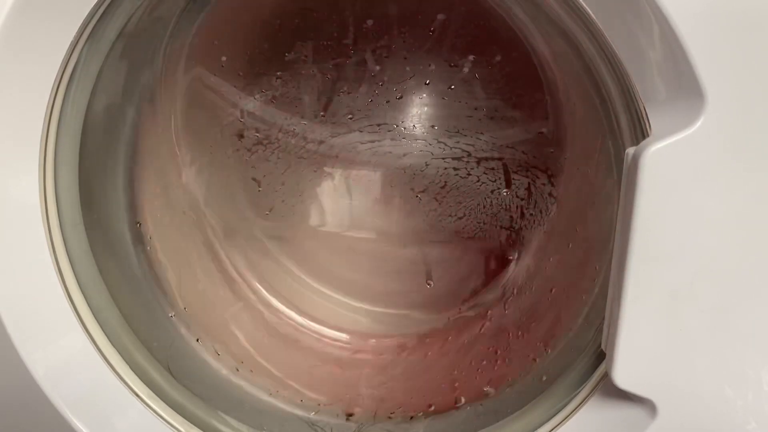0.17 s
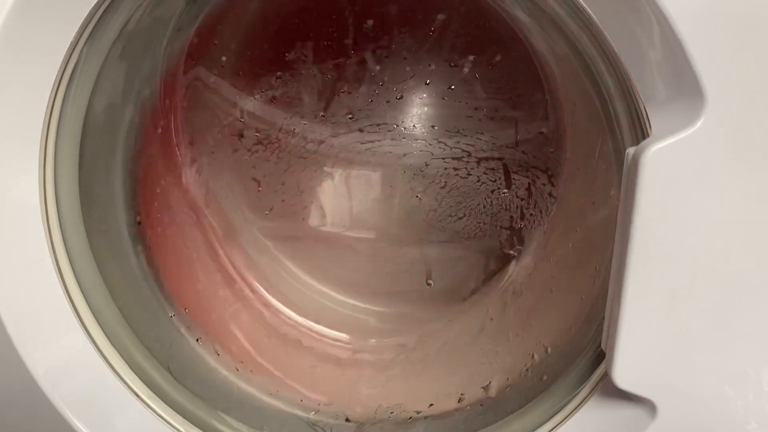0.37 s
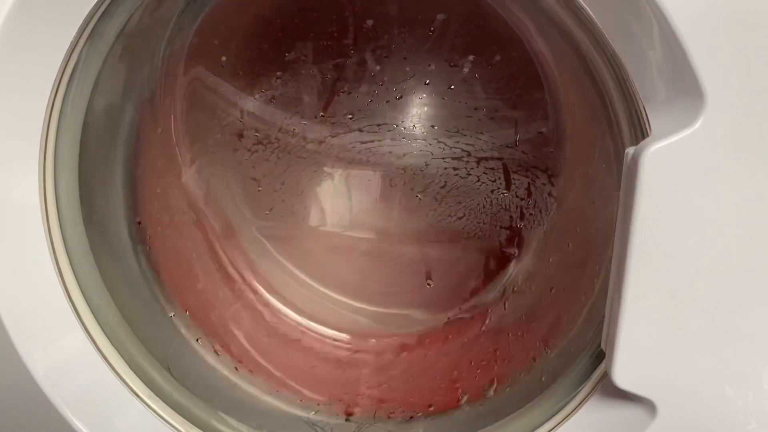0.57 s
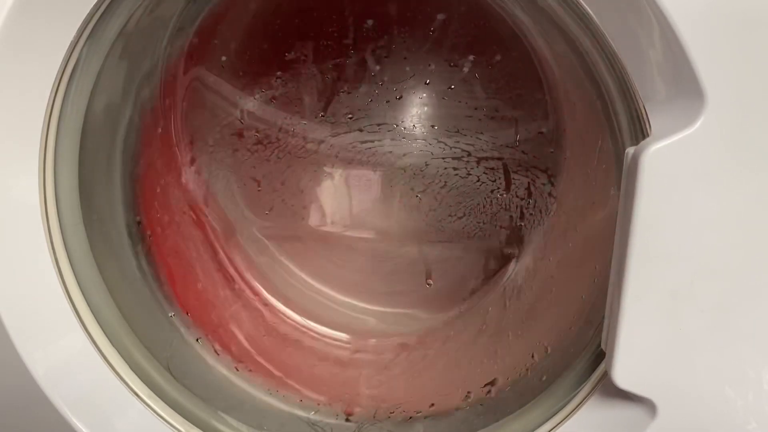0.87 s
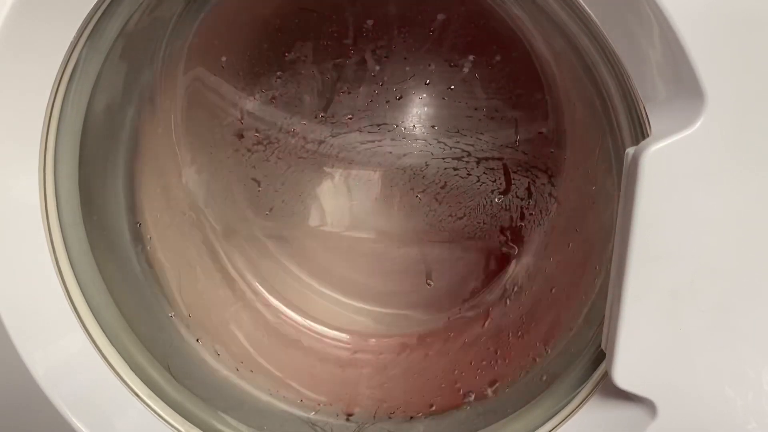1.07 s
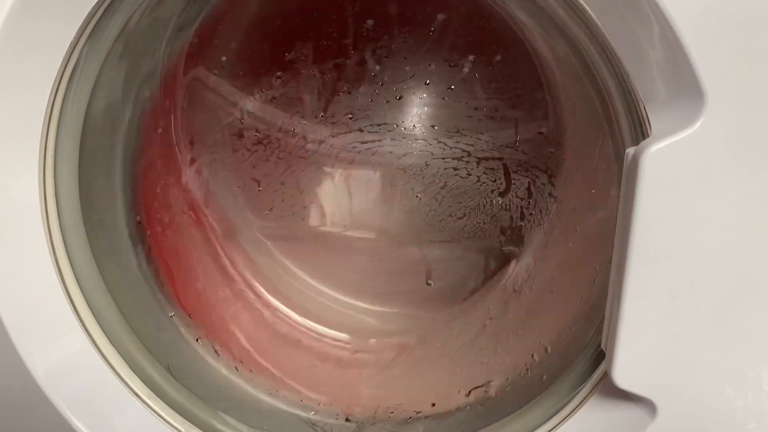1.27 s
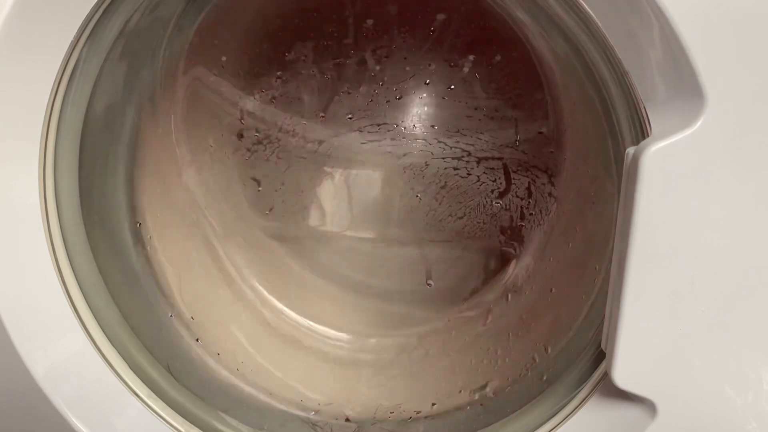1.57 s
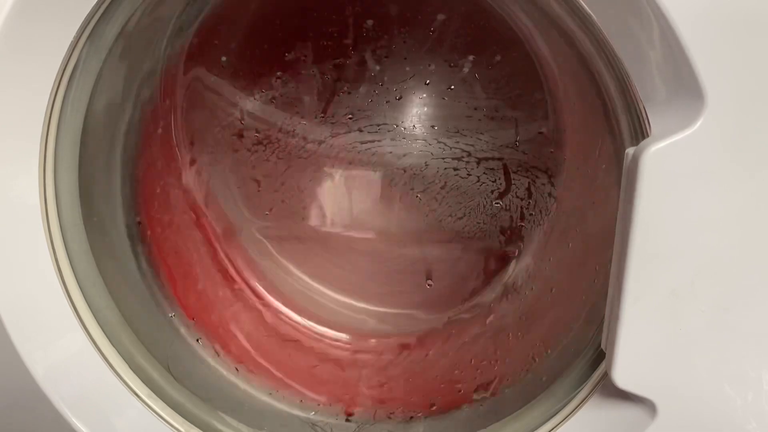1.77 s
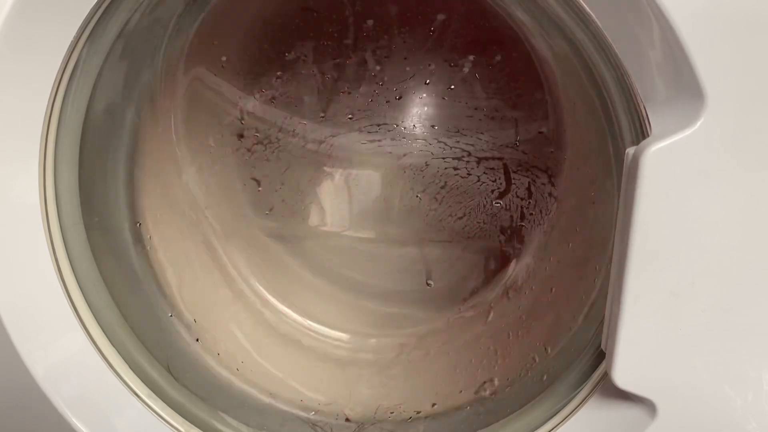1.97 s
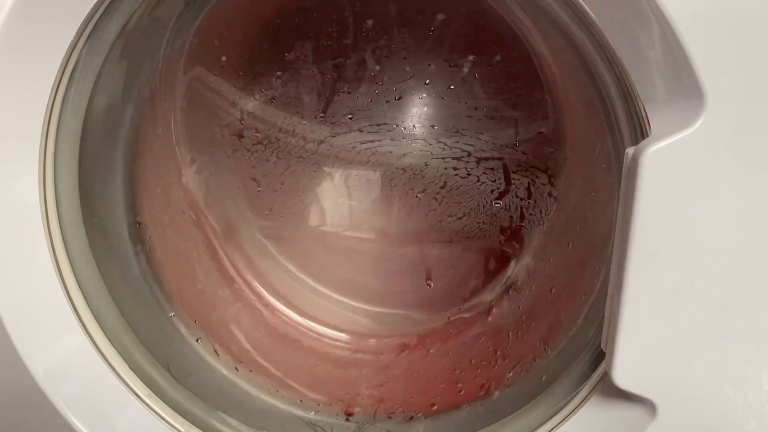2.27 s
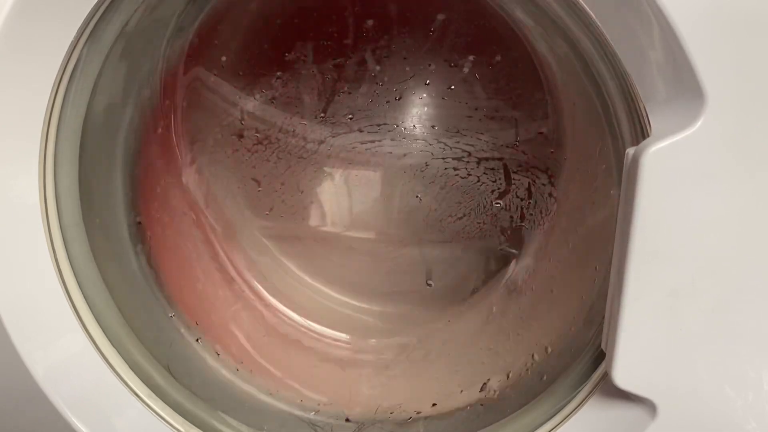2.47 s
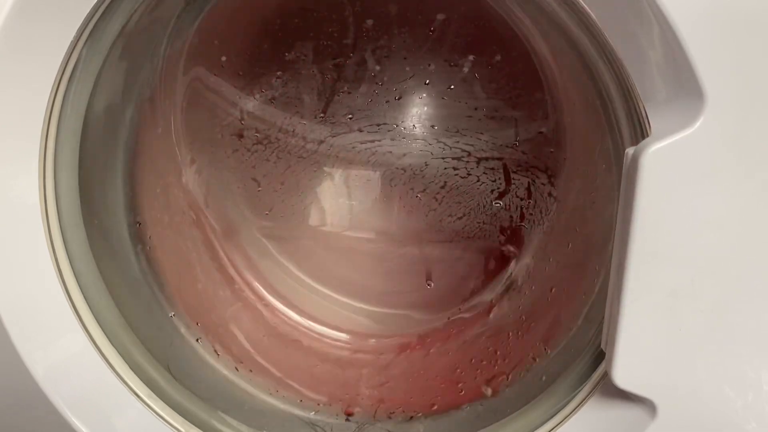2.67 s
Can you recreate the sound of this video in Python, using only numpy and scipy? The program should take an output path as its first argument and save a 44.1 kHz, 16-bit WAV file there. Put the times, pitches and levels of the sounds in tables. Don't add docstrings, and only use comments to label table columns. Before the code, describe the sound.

A front-loading washing machine spins continuously at high speed, heard close to the door in a small room: low motor hum, very rapid drum thumps, high thin whines, broadband roar and hiss, pitch creeping slightly upward.

```python
import sys
import numpy as np
from scipy import signal
from scipy.fft import rfft, irfft, next_fast_len
from scipy.io import wavfile
from scipy.ndimage import uniform_filter1d, map_coordinates

SR = 44100
rng = np.random.default_rng(int(sys.argv[2]) if len(sys.argv) > 2 else 0)


def wrap_up_sound(samples):
    columns = np.atleast_2d(samples).T
    tamed = np.clip(columns, -1, 1)
    steps = np.round(tamed * 32767).astype(np.int16)
    wavfile.write(sys.argv[1], SR, steps)


def to_linear_factor(level_db):
    exponent = np.asarray(level_db, float) / 20
    return 10 ** exponent


N = 123921
T = np.arange(N) / SR
PROGRESS = np.linspace(0, 1, N)
BELT_RATIO = 11.979
SLOTS, BARS = 18, 36
MAINS_PULSE_HZ = 100
SLOT_SIDE, BAR_SIDE = (4.2, -1.1), (.1, 2.08)  # (left-right level/dB, left lead/rad)


def unit(x):
    return x / np.sqrt(np.mean(x ** 2) + 1e-20)


def along(points, hz):
    f, value = np.transpose(points)
    return np.interp(np.log(hz + 1), np.log(f + 1), value)


def wobble(rate_hz):
    coarse = np.arange(0, N + 16, 16)
    knots = rng.standard_normal(int(N * rate_hz / SR) + 4)
    smooth = map_coordinates(knots, [coarse * rate_hz / SR])
    return np.interp(np.arange(N), coarse, smooth)


def filtered(x, response):
    m = next_fast_len(N + 8192)
    spectrum = rfft(x, m) * response(np.fft.rfftfreq(m, 1 / SR))
    return irfft(spectrum, m)[..., :N]


def tone(phase, level_db, lean_db, lead):
    left = np.cos(phase)
    right = to_linear_factor(-lean_db) * np.cos(phase - lead)
    return np.sqrt(2) * to_linear_factor(level_db) * np.array([left, right])


# (t/s, shaft speed f/Hz, hum level/dB)
SPIN_UP = [
    (0, 263.95, -25.5),
    (.25, 264.85, -25.7),
    (.5, 265.72, -26),
    (.8, 266.55, -27),
    (1.15, 267.45, -29.5),
    (1.65, 268.44, -31),
    (1.95, 268.9, -28),
    (2.4, 269.32, -27),
    (2.81, 269.46, -27.5),
]
# (t/s, slot whine level/dB, its sway/rad, its left-right level/dB,
# its left lead/rad, bar whine level/dB, its sway/rad)
WHINES = [(0, -36, .6, 6, -.6, -41.5, .5), (.3, -36, .6, 6, -.2, -44, .6), (.5, -41, 1.4, 1, .4, -42, 1.1),
          (.7, -41, 1.6, 1, -1.6, -41, 2.1), (.9, -37, 1.0, 3, -1.7, -40.5, 2.1),
          (1.1, -33.5, .4, 7, -1.6, -39.5, 1.7), (1.3, -35, .2, 8, -2.5, -37.5, 1.3),
          (1.5, -36, .25, 4, -2.3, -36, .9), (1.7, -38, .4, 1, -1.7, -32.5, .45),
          (1.9, -36.5, .5, 0, -1.2, -32, .7), (2.1, -35, .55, 2, -1.2, -32, 1),
          (2.3, -34, .5, 2, -1, -31.5, 1.2), (2.5, -34, .55, 1, -.9, -31.5, 1.1),
          (2.81, -33, .5, 2, -.8, -32, .6)]


def controls():
    curves = []
    for table in (SPIN_UP, WHINES):
        times, *columns = np.transpose(table)
        curves += [np.interp(T, times, column) for column in columns]
    hz, *levels = curves
    shaft = 2 * np.pi * np.cumsum(hz) / SR
    thump_at = round(.499 * SR)
    return shaft, (shaft - shaft[thump_at]) / BELT_RATIO, levels


# (multiple of drum speed, left level/dB, left-right level/dB, left lead/rad,
# growth over the spin-up/dB)
DRUM = [(1, -49, 0, 0.1, -1), (2, -41, 0, 0.1, -1), (3, -24.5, 1, 0.2, 0), (4, -30, 0, -0.0, 1),
        (5, -28.5, 0, -0.1, 7.5), (6, -31, 4, 0.2, 1), (7, -31, 6, -0.1, 0), (8, -43, -1, 0.5, 2),
        (9, -37, -3, 1.0, -4), (10, -46, 0, 0.6, 0), (11, -38, -3, -0.4, 8), (13, -39, 5, -0.3, 4),
        (14, -53, 2, -0.1, -4), (15, -31.5, 8, -0.5, 6), (16, -42, 3, -1.0, -6), (17, -45, 1, -0.1, 6)]
# (multiple of drum speed, left level/dB, left-right
# level/dB, left lead/rad)
DRUM_HIGH = [(19, -44, 2, -0.3), (20, -51, 2, -0.9), (21, -45, 2, -0.3), (22, -54, 5, 2.8), (23, -49, 0, -1.3),
             (25, -49, -6, 0.3), (26, -51, -3, 0.6), (28, -44, -1, 0.1), (29, -51, 1, 0.0), (30, -45, 8, -0.9),
             (31, -42, 6, -1.0), (32, -52, 5, 2.3), (33, -48, -1, 0.9), (35, -48, 4, 0.2), (37, -47, 5, 0.6),
             (38, -51, 4, 0.9), (40, -55, 7, 0.7), (41, -53, 3, -0.3), (43, -55, 1, -1.8)]


def drum(angle):
    slip_rad, mode_order, mode_span = 1.1, 4.4, 1
    odd_even_rad, scatter_rad = .55, .06

    def order(k, db, lean, lead, grow_db=0):
        slip = slip_rad * (.5 - PROGRESS) / (1 + ((k - mode_order) / mode_span) ** 2)
        start = np.pi + odd_even_rad * (-1) ** k + scatter_rad * k * rng.normal() + slip
        level = db + grow_db * (PROGRESS - .5) + .6 * wobble(2.57)
        return tone(k * angle + start + 0.19 * wobble(1.45), level, lean, lead)

    return sum(order(*row) for row in [*DRUM, *DRUM_HIGH])


# (f/Hz, left lead/rad)
LEAD = [(0, 0), (1200, 1.6), (2200, 0), (3300, .9), (4300, .5), (5600, -2.9), (6800, -6.25),
        (15250, -18.95)]


def lead_at(hz):
    lead = np.interp(hz, *np.transpose(LEAD))
    direct = hz > 5900
    return lead - .38 * np.sin(2 * lead) * direct


def whine(phase, level_db, sway, side, angle, swell, swell_lead, ripple, flutter):
    mains = 2 * np.pi * MAINS_PULSE_HZ * T
    size = 1 + swell * np.cos(angle + swell_lead) + ripple * np.cos(mains) + flutter * wobble(300)
    unsteady = ripple * np.sin(mains) + flutter * (wobble(58) + wobble(250))
    bent = phase + sway * np.cos(angle - np.pi / 9) + unsteady
    return size * tone(bent, level_db, *side)


# (f/Hz, level/dB)
MAINS_HUM = [(50, -51), (100, -36.5), (300, -48)]
# (multiple of shaft speed, left level/dB, left-right level/dB, left lead/rad, growth/dB)
SHAFT = [(2, -39, 6, -0.5, 3), (3, -43, 5, 2.3, 0), (4, -48, 3, 1.2, 0), (5, -52, 3, 2.5, 0),
         (6, -62, 3, 0.0, -1), (7, -56, 1, -3.1, 7), (8, -64, 0, -1.7, -6), (9, -59, 0, -1.1, 0),
         (10, -61, 3, 0.6, -2), (11, -59, 3, 0.5, 9), (13, -60, 5, 1.1, 0), (14, -54, 6, 0.4, 7),
         (15, -58, 3, 0.4, 7), (16, -48.5, 3, 1.0, -20), (17, -55, 5, 0.1, 8), (19, -57, 0, 0.2, -3),
         (20, -54, 2, -0.9, 1), (21, -56, 5, 3.1, 9), (22, -61, 8, 2.2, -1), (23, -59, 4, -0.2, -2)]
# (multiple of shaft speed, level/dB, growth/dB)
BRUSH = [(26, -60, 7), (28, -61, -3), (29, -60, -3), (30, -61, 4), (32, -54, -2), (33, -53, 3),
         (34, -60, -4), (35, -56, -3), (37, -57, 5), (38, -54, 8), (39, -60, 2), (40, -63, 2),
         (44, -67, -2), (52, -61, 10), (54, -60, 0), (56, -65, 1)]


def motor(shaft, angle, levels):
    hum_db, slot_db, slot_sway, *slot_side, bar_db, bar_sway = levels
    hum = tone(shaft + 2.1, hum_db + 0.44 * wobble(5.4), -3.25, 0.066)
    buzz = sum(tone(2 * np.pi * hz * T, db + wobble(4.3), 0, 0) for hz, db in MAINS_HUM)

    def order(k, db, lean, lead, grow_db):
        phase = k * shaft + rng.uniform(0, 2 * np.pi) + .022 * k * np.cos(angle) + .25 * wobble(15)
        level = db + grow_db * (PROGRESS - .5) + 1.3 * wobble(2.19)
        return tone(phase, level, lean, lead) * (1 + 0.26 * np.cos(angle + k))

    late_hz = SPIN_UP[-2][1]
    brush_rows = [(k, db, 0, lead_at(k * late_hz), grow) for k, db, grow in BRUSH]
    orders = sum(order(*row) for row in [*SHAFT, *brush_rows])
    slot_whine = whine(SLOTS * shaft, slot_db + 0.55 * wobble(9.98), slot_sway, slot_side, angle,
                       swell=.3, swell_lead=1.3, ripple=.05, flutter=.11)
    bar_whine = whine(BARS * shaft, bar_db + 0.71 * wobble(25.04), bar_sway, BAR_SIDE, angle,
                      swell=.3, swell_lead=.6, ripple=.08, flutter=.17)
    return hum + buzz + orders + slot_whine + bar_whine


def sparks(shaft, angle):
    size = to_linear_factor(-49 + 2 * np.cos(angle) + wobble(10.2))
    under = BARS * shaft - 2 * np.pi * 170 * T
    skirt = size * sum(wobble(200) * tone(under + turn, -2.5, *BAR_SIDE) for turn in (0, np.pi / 2))
    beats = sum(tone(BARS * shaft - k * angle + 1.5 * wobble(31),
                     -43 - 40 * PROGRESS + 2 * wobble(9.3), *BAR_SIDE) for k in (1, 2))
    pull = tone(SLOTS * shaft + 2 * np.pi * MAINS_PULSE_HZ * T,
                -42 - 30 * PROGRESS + 2 * wobble(19.4), *SLOT_SIDE)
    return skirt + beats + pull


# (f/Hz, width/Hz)
CABINET = [(830, 28), (690, 40), (970, 110), (1340, 40), (1840, 40), (1940, 50), (2070, 50), (2270, 40),
           (3500, 150)]


def panels(hz):
    return to_linear_factor(5.5 * sum(1 / (1 + (2 * (hz - centre) / width) ** 2) for centre, width in CABINET))


# (f/Hz, likeness)
ALIKE = [(60, .97), (300, .8), (600, .58), (1000, .3), (2000, .3), (3800, .65), (5700, .4), (6300, .968)]
# (f/Hz, left-right level/dB)
LEAN = [(100, .5), (600, 1.5), (1500, 1.2), (4400, 3), (6200, 0), (15000, 0)]


def rush(spectrum, patchy_db):
    z = signal.stft(rng.standard_normal((2, N)), nperseg=512)[2]
    field = uniform_filter1d(rng.standard_normal(z.shape[1:]), 6, 0)
    field = uniform_filter1d(field, 10, 1)
    pair = signal.istft(z * to_linear_factor(patchy_db * unit(field)), nperseg=512)[1][:, :N]
    closed = [(spectrum[0][0] / 2, -60), *spectrum, (spectrum[-1][0] * 2, -60)]

    def shared_and_opposed(hz):
        turn = np.arccos(np.clip(along(ALIKE, hz), -1, 1)) / 2
        return to_linear_factor(along(closed, hz)) * panels(hz) * [np.cos(turn), np.sin(turn)]

    def port_difference(hz):
        half = to_linear_factor(along(LEAN, hz) / 2) * np.exp(.5j * lead_at(hz))
        return np.array([half, 1 / half])

    a, b = filtered(pair, shared_and_opposed)
    return unit(filtered(np.array([a + b, a - b]), port_difference))


# (f/Hz, level/dB per Hz)
ROAR = [(25, -23), (60, -3.5), (110, 3), (200, -11), (300, -5.5), (500, -8.5), (850, -8.5), (1200, -23)]
# (f/Hz, level/dB per Hz)
HISS = [(1100, -0.5), (2100, -2), (2800, -5), (4700, 0.5), (6300, -8), (8600, -3.5), (11000, -10),
        (15800, -14)]


def tub(shaft, angle):
    roar_db = -29.5 + 0.4 * np.cos(angle) + 0.24 * wobble(1.8)
    hiss_db = -35 + 0.28 * np.cos(angle + 0.27) + 0.32 * np.cos(shaft) + 0.17 * wobble(6.67)
    return to_linear_factor(roar_db) * rush(ROAR, patchy_db=1.5) + to_linear_factor(hiss_db) * rush(HISS, patchy_db=0.86)


def scene():
    shaft, angle, levels = controls()
    return drum(angle) + motor(shaft, angle, levels) + sparks(shaft, angle) + tub(shaft, angle)


def roll_off(x):
    return signal.sosfilt(signal.butter(12, 16530, fs=SR, output="sos"), x)


def record(dry):
    mix = filtered(dry, lambda hz: hz < 15760)
    return roll_off(mix)


dry = scene()
out = record(dry)
wrap_up_sound(out)
```